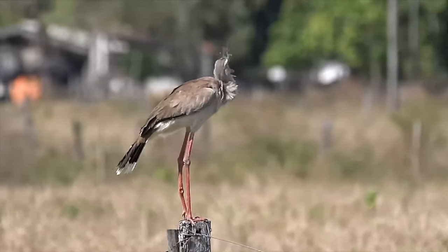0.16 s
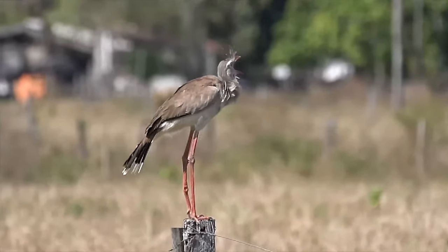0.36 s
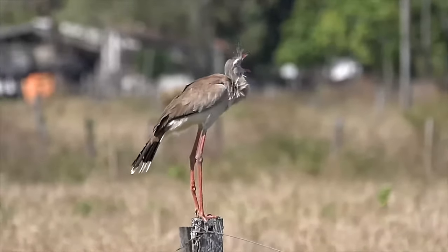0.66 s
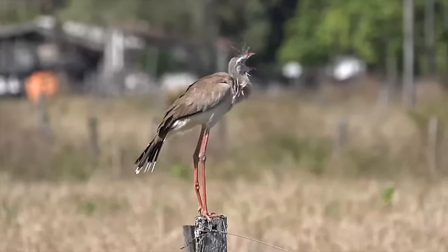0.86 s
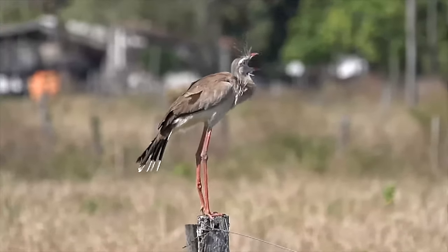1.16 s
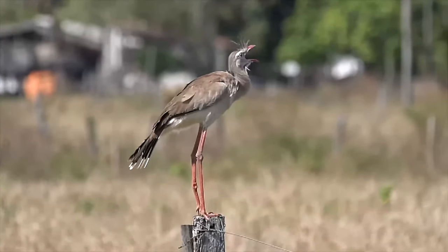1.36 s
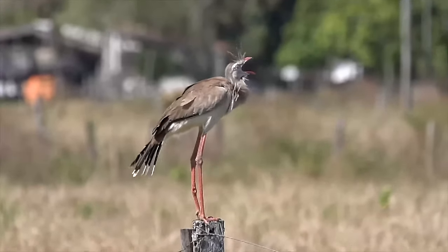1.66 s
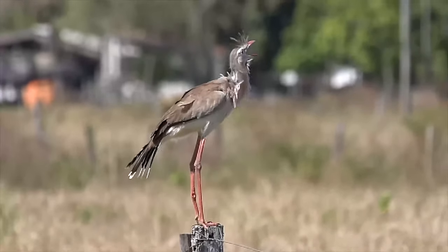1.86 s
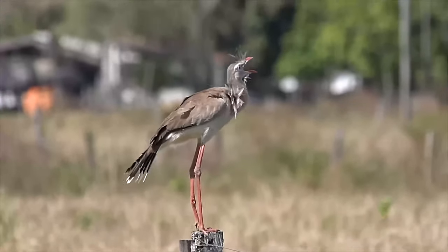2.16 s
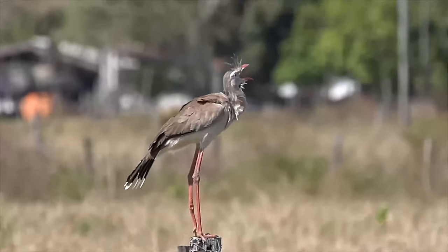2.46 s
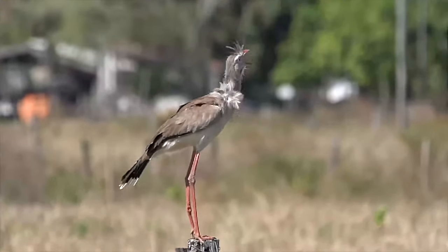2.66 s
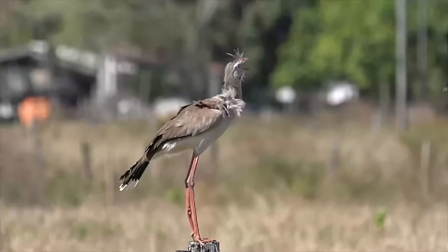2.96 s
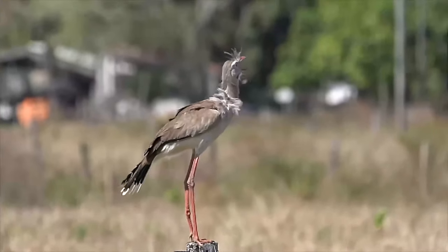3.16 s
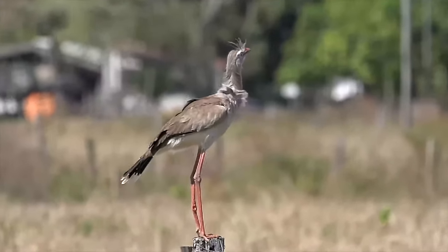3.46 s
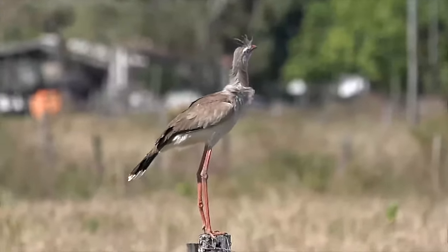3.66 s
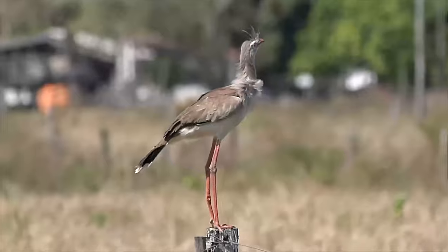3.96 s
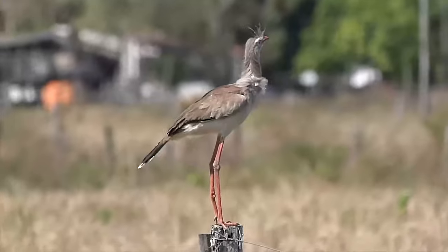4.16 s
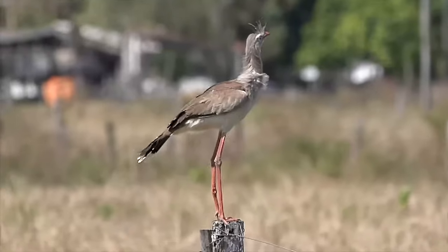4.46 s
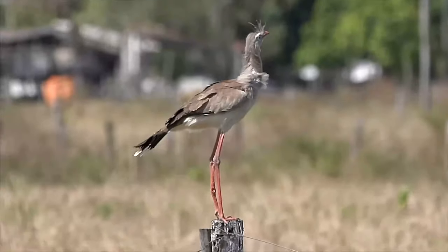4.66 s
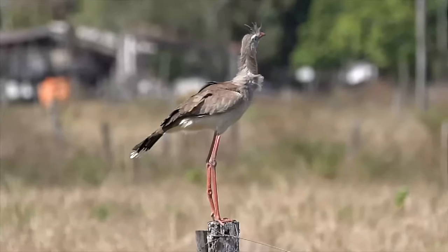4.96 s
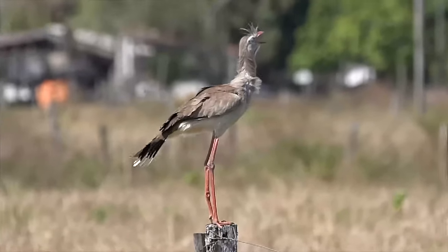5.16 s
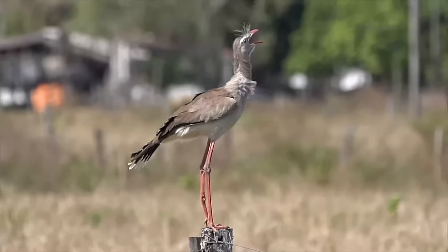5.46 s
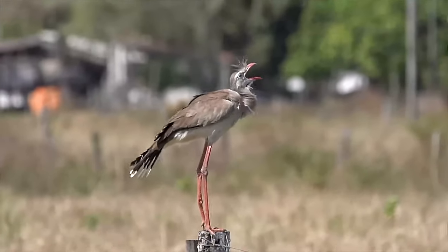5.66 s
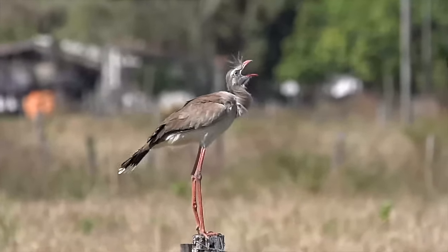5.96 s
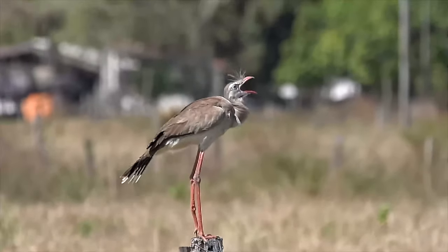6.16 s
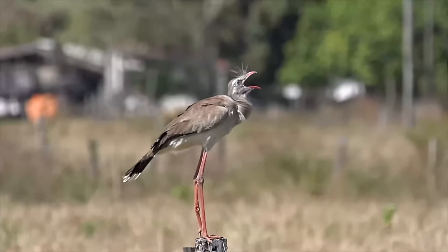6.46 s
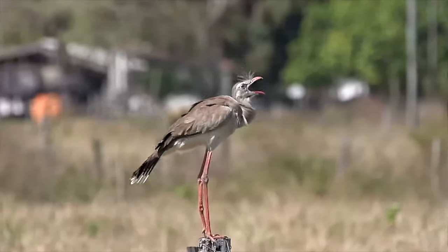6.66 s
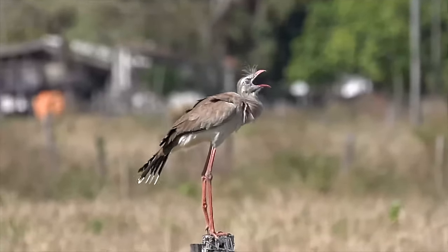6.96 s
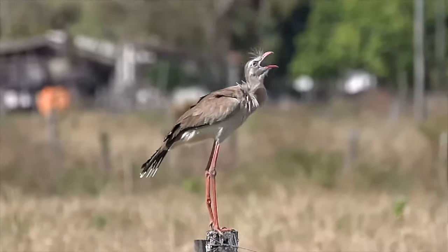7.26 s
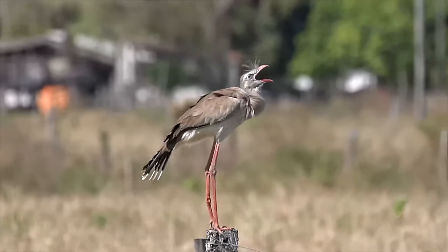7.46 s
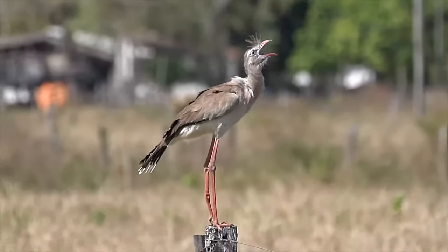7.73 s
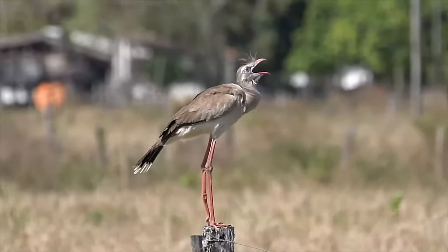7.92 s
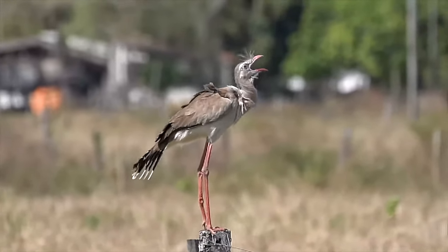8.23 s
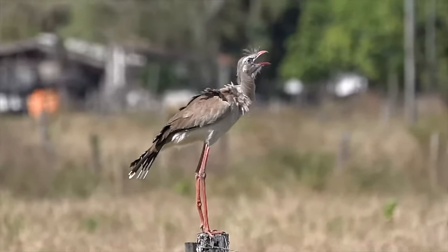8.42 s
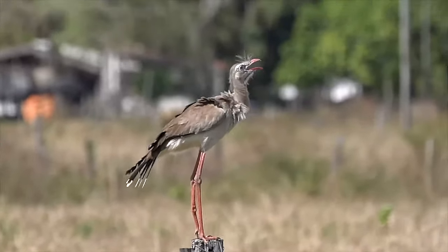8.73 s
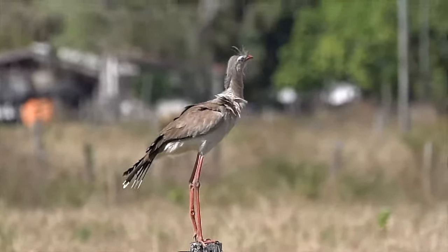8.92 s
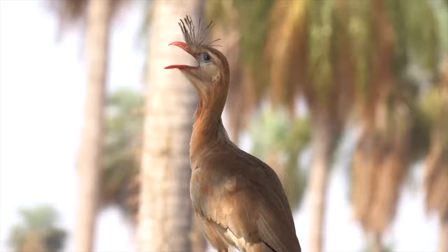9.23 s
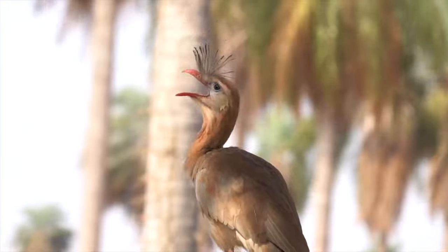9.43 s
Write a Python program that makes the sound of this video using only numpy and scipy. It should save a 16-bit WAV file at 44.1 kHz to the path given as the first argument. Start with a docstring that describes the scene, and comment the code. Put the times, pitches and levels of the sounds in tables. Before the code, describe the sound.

Loud, raspy-edged bird yelps descend in series across a windy pasture, then a closer bird calls with more echo.

```python
"""Large ground birds cluck and yelp in a windy pasture: each note is a clear arched stack of harmonics
that cracks into a rasp at both ends, where the vocal membranes flap chaotically. Far trees return the
notes, and gusts buffet a two-port microphone over a faint murmur, dry rustles and hiss.
Near the end the scene changes to a closer bird among palms, with more echo, a far dove and no wind."""
import sys
import numpy as np
from scipy import signal
from scipy.fft import rfft, irfft, next_fast_len
from scipy.io import wavfile
from scipy.ndimage import uniform_filter1d, map_coordinates

SR = 44100
rng = np.random.default_rng(int(sys.argv[2]) if len(sys.argv) > 2 else 0)


def file_out(sig):
    """Save sig as 16-bit WAV at sys.argv[1]."""
    # one column per channel
    cols = np.atleast_2d(sig).T
    # limit, then scale
    lim = np.clip(cols, -1, 1)
    pcm = np.round(lim * 32767).astype(np.int16)
    wavfile.write(sys.argv[1], SR, pcm)


N = 422919

# Background strength over time: time_s, murmur_relative_db, hiss_db
BACKGROUND = [(0.0, -59, -62), (0.6, -62.5, -61.5), (1.49, -64, -62), (2.3, -60.5, -59.5),
              (2.72, -64, -60.5), (3.47, -58.5, -56.5), (3.7, -51.5, -54.5), (4.28, -62, -58),
              (4.32, -62, -61), (5.4, -66, -66), (6.2, -55.5, -62.5), (6.89, -63.5, -66), (7.32, -55, -61),
              (7.55, -69, -66), (8.25, -64.5, -63.5), (8.9, -55, -59), (9.32, -42, -58),
              (9.59, -47.5, -57.5)]
# Breaks of the voice: start_s, length_s, first_hz, settled_hz, level_db, octave_db, throb_depth
VOICE_BREAKS = [(.386, .054, 2790, 2015, -13.5, -26, 0.82), (0.637, 0.016, 1150, 1050, -35, -23, 0.73),
                (0.86, 0.014, 2545, 1953, -14.5, -27, 0.5), (1.307, 0.012, 2270, 1810, -13.5, -27.5, 0.2),
                (4.304, 0.015, 1890, 1660, -16.5, -20.5, 0.4), (4.323, 0.017, 1696, 1750, -24, -20, 0),
                (4.416, 0.022, 1424, 1440, -33, -6, 0.2), (4.642, 0.023, 1425, 1404, -28.5, -9, 0.16),
                (4.651, 0.024, 1380, 1616, -20, -15, 0.73), (4.746, 0.016, 1650, 1584, -22.5, -9.5, 0.12),
                (4.978, 0.033, 1650, 1475, -24, -20, 0), (5.071, 0.019, 1560, 1530, -33.5, -15, 0.3),
                (6.228, 0.02, 2880, 1853, -21.5, -12, .6), (6.696, 0.0096, 2180, 1776, -18.5, -17.5, 0.6),
                (9.188, 0.0077, 1406, 1418, -11.5, -12, 0)]


def amp(db):
    """Amplitude ratio of a level in decibels."""
    return 10 ** (np.asarray(db) / 20)


def unit(x):
    """Normalisation to an rms of 1."""
    return x / np.sqrt(np.mean(x ** 2) + 1e-20)


def along(points, hz):
    """Interpolation of a table's columns on a logarithmic frequency axis."""
    knots_hz, *columns = np.transpose(points)
    return np.squeeze([np.interp(np.log(hz + 1), np.log(knots_hz + 1), c) for c in columns])


def curves(rows):
    """Linear interpolation of a table's columns over time, one value per sample."""
    times, *columns = np.transpose(rows)
    return [np.interp(np.arange(N) / SR, times, c) for c in columns]


def wobble(rate):
    """Smooth random modulation: a spline through rate knots a second."""
    return map_coordinates(rng.standard_normal(int(N * rate / SR) + 4), [np.arange(N) * rate / SR])


def filtered(x, response):
    """Linear filtering: the spectrum times a complex frequency response."""
    size = next_fast_len(N + SR // 2)
    return irfft(rfft(x, size) * response(np.fft.rfftfreq(size, 1 / SR)), size)[..., :N]


def noise(spectrum, channels=1):
    """Spectral shaping of white noise, at an rms of 1."""
    return unit(filtered(rng.standard_normal((channels, N)), lambda hz: amp(along(spectrum, hz))))


def ports(balance_db, lead_rad):
    """Level and phase differences between two ports, at constant total power."""
    left = amp(balance_db) * np.sqrt(2 / (1 + amp(2 * balance_db)))
    right = left / amp(balance_db)
    return np.array([left * np.exp(.5j * lead_rad), right * np.exp(-.5j * lead_rad)])


def bursts(rows):
    """Envelope of transients: quick rise, hold, short fall."""
    out = np.zeros(N)
    for start, db, length in rows:
        t = np.arange(round((length + .01) * SR)) / SR
        edge = np.clip(np.minimum(t / 0.0042, (length - t) / 0.0054 + 1), 0, 1)
        out[round(start * SR):][:len(t)] += amp(db) * edge
    return out


def wind():
    """Turbulent pressure: eddies buffet the ports and flap brightly over a gentler, deep rumble."""
    # Wind strength: time_s, buffet_db, brightness_db
    strength = [(0.0, -65.5, -12), (0.38, -37, -26.5), (0.48, -68.5, -5.5), (1.26, -43.5, -23.5),
                (1.61, -74.5, 13.5), (1.98, -43.5, -25), (2.44, -26, -15.5), (2.79, -41, -15.5),
                (3.21, -55.5, 1.5), (3.29, -37, -12.5), (3.54, -51, 2.5), (4.12, -40.5, -14),
                (4.6, -21.5, -15.5), (4.72, -30, -17.5), (4.8, -24.5, -13), (4.87, -22.5, -2),
                (5.3, -37.5, -14.5), (5.43, -26, -6.5), (5.53, -32, -7.5), (5.68, -22.5, -1),
                (5.75, -30.5, -8.5), (6.4, -20, -10), (6.45, -22.5, -1), (7.08, -21, -6),
                (7.23, -34.5, -11), (7.61, -27, -11.5), (7.86, -33, -13), (8.16, -65, 2),
                (8.51, -46.5, -13.5), (9.02, -52, 11.5)]
    # Gusts and lulls: start_s, length_s, buffet_change_db, brightness_change_db
    gusts = [(1.079, 0.091, 6.5, 5.5), (1.923, .06, 9, -1.5), (2.107, .11, 4, 0.5), (2.232, 0.04, -7.5, 12),
             (3.332, 0.057, 7.5, -0.5), (4.306, 0.04, 5, 5.5), (4.533, 0.14, 1.5, 4.5),
             (4.849, 0.22, 0.5, 6.5), (5.392, 0.034, 7.5, 7.5), (5.642, .06, 5, 2.5),
             (5.779, .07, -3.5, 11.5), (5.866, 0.046, 7.5, -5.5), (5.94, 0.055, 3, 2),
             (6.058, .05, -12.5, -2.5), (6.124, .07, -0.5, 6), (7.037, .05, 2, 1), (7.565, 0.075, -1, 1.5),
             (7.92, 0.059, -8, -5)]
    # Turbulence spectra, deep to bright: frequency_hz, relative_density_db
    rumble_spectrum = [(12, -26.5), (25, -0.5), (55, 8.5), (90, 2), (160, -40.5), (600, -120)]
    buffet_spectrum = [(40, -48), (65, -0.5), (100, 2), (200, -3), (300, -15), (500, -72.5), (1500, -120)]
    flap_spectrum = [(120, -32.5), (200, -7), (313, -2.5), (362, -5.5), (426, -9), (1100, -31),
                     (1430, -60.5), (2420, -120)]
    # Single strong eddies: centre_s, frequency_hz, peak_db
    thumps = [(4.34, 250, -24), (4.484, 400, -14), (5.41, 330, -16), (5.47, 300, -24)]
    # Wind at the ports: frequency_hz, left_minus_right_db, left_lead_rad
    port_differences = [(30, 0, .4), (90, -.3, .6), (180, -.6, 1.0), (350, -1.5, 1.5), (700, -2.3, 1.75)]
    t = np.arange(N) / SR
    buffet_db, bright_db = curves(strength)
    buffet_db += 3 * wobble(7.9)  # quick swings in strength
    for start, length, gust_db, sharp_db in gusts:
        shape = np.clip(np.minimum(t - start, start + length - t) / 0.013 + .5, 0, 1)
        buffet_db += gust_db * shape
        bright_db += sharp_db * shape
    eddies = wobble(25)
    rumble_db = 0.51 * uniform_filter1d(buffet_db, size=4000) - 23.5 + 1.6 * eddies
    rumble = amp(rumble_db) * noise(rumble_spectrum, channels=2)
    buffet = amp(buffet_db) * unit(amp(2.13 * eddies) * noise(buffet_spectrum, channels=2))
    spikes = amp(1.9 * eddies + 3.96 * wobble(90))
    flap = amp(buffet_db + bright_db) * unit(spikes * noise(flap_spectrum, channels=2))
    common, opposed = rumble + buffet + flap
    lag = np.arange(-400, 400) / SR
    for centre, hz, db in thumps:
        pulse = np.exp(-(lag * hz * 1.2) ** 2) * np.cos(2 * np.pi * hz * lag)
        common[round((centre + lag[0]) * SR):][:len(lag)] += amp(db) * pulse
    return filtered(common, lambda hz: ports(*along(port_differences, hz))) + 0.05 * opposed * [[1], [-1]]


def field_murmur():
    """Incoherent sources: far leaves and field sounds merge into a wavering noise."""
    # Murmur spectrum: frequency_hz, relative_density_db
    spectrum = [(250, -5.5), (500, -1.5), (1200, 0), (2500, -11), (5000, -17.5), (7000, -81), (12000, -120)]
    murmur_db, _ = curves(BACKGROUND)
    return amp(murmur_db + 6.0 + 0.39 * wobble(16)) * noise(spectrum, channels=2)


def microphone_hiss():
    """Self-noise of the microphone, independent in each channel."""
    # Hiss spectrum: frequency_hz, relative_density_db
    spectrum = [(2350, -11.5), (4000, -1.5), (5310, -2), (5830, 1), (9830, -4.5), (15200, -8), (16000, -32)]
    _, hiss_db = curves(BACKGROUND)
    return amp(hiss_db) * noise(spectrum, channels=2)


def rasp(note_rasp_db):
    """Chaotic oscillation: in clucks, notes and squawks the membranes' rate lurches every few cycles."""
    # Short rasping clucks: start_s, level_db, length_s
    clucks = [(.001, -28.5, 0.018), (.15, -36.5, 0.012), (.316, -37.5, 0.021), (.638, -53, 0.082),
              (.79, -37, 0.013), (3.504, -42, 0.013), (4.255, -37.5, 0.013), (5.277, -39.5, 0.011),
              (5.578, -45, 0.0077), (5.95, -44, 0.0095), (6.107, -46, 0.018), (6.235, -35.5, 0.055),
              (8.8, -19, 0.0042), (9.46, -28, 0.011)]
    # Throat response: frequency_hz, gain_db
    throat = [(600, -13.5), (950, -11.5), (1400, 3), (2200, 1.5), (2900, -4.5), (3500, -18.5),
              (5000, -15.5), (8000, -35.5), (14000, -34.5)]
    phase = 2 * np.pi * np.cumsum(1250 * np.exp(.17 * wobble(380))) / SR
    flaps = amp(0.31 * wobble(380)) * sum(np.sin(k * phase + k * k) for k in range(1, 7))
    creak = unit(filtered(flaps, lambda hz: amp(along(throat, hz))))
    breath = unit(amp(0.34 * wobble(390)) * noise(throat)[0])
    screech = bursts([(start, db - 13, length) for start, length, _, _, db, _, _ in VOICE_BREAKS])
    return (amp(note_rasp_db) + bursts(clucks) + screech) * unit(creak + .9 * breath)


def note(start, length, first_hz, top_hz, last_hz, top_at, db, onset_db, close_db, *rasp_levels):
    """Frequency and amplitude modulation of one yelp: times, pitch arch, voice level and rasp level."""
    attack_s, release_s, tail_s, sag_hz_per_s = .002, .006, .031, 3700
    half, end = length / 2, length + release_s + tail_s
    t = np.arange(-attack_s, min(end, N / SR - start - 1 / SR), 1 / SR)
    progress, top_at = np.clip(t / length, 0, 1), np.clip(top_at, .03, .97)
    rise = np.clip(1 - progress / top_at, 0, 1)
    fall = np.clip((progress - top_at) / (1 - top_at), 0, 1)
    pitch = top_hz - (top_hz - first_hz) * rise ** 2.42 - (top_hz - last_hz) * fall ** 2.8
    pitch -= sag_hz_per_s * np.clip(t - length, 0, None)
    voice_times = [-attack_s, 0, min(0.023, half), length, length + release_s, end]
    envelope_db = np.interp(t, voice_times, [onset_db - 34, onset_db, 0, 0, -30, -70])
    level_db = db + close_db * fall ** 3.2 + envelope_db
    first, middle, last = rasp_levels
    # The rasp outlasts the voice.
    rasp_times = [-attack_s, 0, min(0.025, half), length - min(.01, half), length, length + 0.017, end]
    rasp_db = np.interp(t, rasp_times, [first - 34, first, middle, middle, last, last - 3, last - 22])
    return start + t, pitch, level_db, rasp_db


def voice():
    """Source and filter: windpipe and bill shape a harmonic series. Returns it and the rasp's level."""
    # Yelps: start_s, length_s, first_hz, top_hz, last_hz, top_at_fraction, level_db, onset_relative_db,
    # close_relative_db, rasp_onset_db, rasp_middle_db, rasp_close_db, overtones_relative_db,
    # slope_db_per_harmonic, third_harmonic_offset_db, fourth_harmonic_offset_db
    yelps = [ (0.169, 0.066, 1228, 1343, 1267, 0.74, -26.5, -0.5, 1.5, -41, -55, -35, 2, -4, 2, 0.5),
             (0.419, 0.047, 1198, 1186, 1208, 0.96, -32.5, 5, -9, -50, -56, -38.5, 9, -3, 6, 6),
             (.438, 0.072, 1585, 1529, 1324, 0.064, -17, -5.5, -11, -39, -43.5, -29, -1, -4, 1.5, -1),
             (.87, 0.11, 1572, 1533, 1350, 0.23, -15.5, -3, -9.5, -54, -50, -24.5, 1, -4, -1, -5.5),
             (1.313, .123, 1474, 1512, 1378, 0.36, -15.5, -2, -9, -54.5, -54.5, -27.5, -2, -5, -15.5, 5),
             (1.731, 0.13, 1358, 1449, 1350, .55, -16.5, -5.5, -10, -22.5, -65.5, -25.5, -1, -4.5, 4, 7),
             (2.139, 0.13, 1269, 1387, 1277, .55, -15, -1.5, -10.5, -20.5, -53, -24, 2, -3.5, -0.5, 5),
             (2.526, 0.13, 1199, 1327, 1206, .55, -15, -3, -11, -20, -45, -26.5, 1.5, -4, 0, 2.5),
             (2.895, 0.13, 1131, 1271, 1120, .45, -15.5, -0.5, -9, -19.5, -39.5, -36.5, -5, -2, -4, 5.5),
             (3.255, .12, 1102, 1174, 1010, 0.48, -14, -5.5, -10.5, -24, -55, -37, -6, -2.5, -8, -6),
             (3.533, 0.042, 846, 893, 912, 0.4, -41, 3.5, 6, -60, -64.5, -53, 6, -9.5, 0, -4),
             (3.803, 0.022, 1097, 1120, 1023, 0.62, -25, -23, -1.5, -20.5, -30, -27.5, 14, -10, 13.5, -10),
             (3.827, 0.074, 1485, 1619, 1510, 0.6, -16, 1.5, -1, -16.5, -46, -24, 6, -7, -5.5, -6.5),
             (4.328, .088, 1847, 1903, 1815, .45, -14, 0.5, -8, -22.5, -62, -39.5, -18, -4, 2.5, 5.5),
             (4.669, 0.089, 1818, 1930, 1875, 0.53, -14.5, -8.5, -10, -30, -51.5, -33.5, -12.5, -4.5, 9.5, 10.5),
             (4.998, 0.084, 1813, 1884, 1800, 0.51, -27.5, 0, -5, -33, -58, -45.5, -13, -6, -5, 12),
             (5.298, 0.037, 860, 1072, 1090, 0.71, -27, -6, 8.5, -25, -32, -32.5, -10, -7.5, 8, -4),
             (5.313, 0.076, 1733, 1818, 1783, 0.5, -24, -2.5, -0.5, -26.5, -40, -42, -6.5, -3.5, -6.5, 5),
             (5.338, 0.064, 1315, 1343, 1245, 0.74, -27, 0.5, 0, -36.5, -36.5, -37, -5.5, -1.5, -5.5, -2.5),
             (5.594, 0.032, 1312, 1396, 1467, .9, -32, -0.5, 12, -36.5, -42, -33.5, 1.5, -6.5, -7.5, -5),
             (5.63, 0.043, 1725, 1760, 1737, 0.17, -25, -1.5, -5, -35.5, -46.5, -37, 1.5, -9.5, -5.5, -8),
             (5.737, 0.1, 1530, 1740, 1675, 1, -19.5, -1, -0.5, -28, -61.5, -36.5, -3.5, -3.5, 4.5, -1.5),
             (5.848, 0.029, 1398, 1335, 1204, .1, -28, 4.5, -2.5, -45.5, -48.5, -31.5, -4.5, -3, 7, 1),
             (5.888, 0.056, 1274, 1386, 1320, 0.6, -29.5, -2.5, 1.5, -31, -58, -36, 6.5, -3.5, -0.5, 4),
             (6.13, .022, 1200, 1218, 1110, .1, -32.5, -6, -4, -29.5, -31, -31, 5, -2.5, 3, 9),
             (6.156, .032, 1210, 1228, 1227, 0.55, -30, -1.5, -2, -35, -39.5, -41.5, 10, -3.5, 1.5, 9),
             (6.242, 0.019, 1500, 1590, 1605, 1, -20, -3, 0, -34.5, -31.5, -40, -1, -4, 12, 10),
             (6.263, 0.039, 1904, 1902, 1760, 0.21, -13.5, -3.5, -7, -32.5, -39, -38, -9.5, -4.5, 6.5, 6),
             (6.3, 0.061, 1590, 1493, 1252, 0.056, -22.5, -1.5, -11.5, -51, -51.5, -35, 1.5, -3, 4, 3.5),
             (6.701, 0.12, 1486, 1536, 1330, .25, -21.5, -1.5, -14, -51, -51.5, -33.5, 3, -2.5, 0.5, 4.5),
             (7.141, 0.14, 1430, 1480, 1313, .3, -20, -3.5, -12, -23, -63.5, -31.5, -0.5, -2, 3.5, 5),
             (7.557, 0.13, 1282, 1413, 1330, 0.55, -20, -5, -7.5, -23, -51, -29, 4, -4.5, 4, -1),
             (7.96, 0.13, 1250, 1375, 1232, 0.65, -20, 0, -11.5, -20.5, -61.5, -31, 1.5, -3, -3, 1),
             (8.345, 0.14, 1203, 1321, 1130, .6, -18, -9, -24, -21, -58, -35.5, -1.5, -3.5, -0.5, -7.5),
             (8.483, 0.03, 967, 1158, 1180, 1, -31.5, 1.5, 6.5, -30, -43, -37, -1, -2.5, 0.5, -25),
             (8.511, 0.032, 1405, 1400, 1380, 0.39, -27, -3.5, 0, -41, -46, -35, -6, -2.5, -22, -9),
             (8.716, 0.13, 1128, 1232, 1070, 0.48, -23.5, 0, -9.5, -28, -42.5, -34.5, 3.5, -3, -1, 6),
             (8.818, 0.081, 1510, 1673, 1640, .65, -17.5, -4.5, -0.5, -16.5, -44, -26, -1, -3, -2, -1),
             (9.028, 0.019, 1186, 1210, 1177, 0.09, -16.5, 9, -11, -31, -27.5, -31, -18, -1, 7.5, 4),
             (9.06, .041, 1172, 1318, 1325, .9, -11, -14, 0, -25.5, -21.5, -40, -8, -9.5, 10.5, 0),
             (9.099, 0.099, 1598, 1764, 1750, .8, -11.5, 0.5, 2, -40, -50.5, -31.5, 2, -7.5, -7, -3),
             (9.477, .108, 1441, 1667, 1508, 0.93, -11, -2, -1.5, -30.5, -39, -23, 4, -7, -9, -6.5), ]
    # Throbs at a fraction of the pitch: start_s, end_s, pitch_divisor, sideband_db
    subharmonics = [(1.352, 1.405, 2, -37), (2.557, 2.592, 3, -31.5), (2.934, 2.965, 3, -19),
                    (3.834, 3.912, 3, -38), (5.333, 5.374, 2, -20.5), (6.252, 6.293, 6, -11.5),
                    (6.696, 6.773, 2, -33.5), (7.64, 7.688, 2, -52), (9.094, 9.175, 42, -15.5),
                    (9.483, 9.57, 22, -13), (9.546, 9.587, 5, -9.5)]
    # Resonances of windpipe and open bill: frequency_hz, gain_db
    tract = [(900, -0.5), (1500, 2), (1900, -0.5), (2300, 0), (2750, 3), (3100, -6), (3650, -9),
             (4200, -3.5), (4600, -10), (5300, -4.5), (6000, -9.5), (6700, -15), (8500, -14.5),
             (11000, -17.5), (15000, -20)]
    out, rasp_db = np.zeros(N), np.full(N, -90.)
    tremor = wobble(120)
    for start, length, *contour, overtones_db, slope_db, third_db, fourth_db in yelps:
        t, pitch, level_db, note_rasp_db = note(start, length, *contour)
        span = slice(round(t[0] * SR), round(t[0] * SR) + len(t))
        pitch = uniform_filter1d(pitch, size=500)
        phase = 2 * np.pi * np.cumsum(pitch * (1 + 0.003 * tremor[span])) / SR
        throb = np.ones(len(t))
        for begin, end, divisor, sideband_db in subharmonics:
            depth = 2 * amp(sideband_db) * np.clip(np.minimum(t - begin, end - t) / 0.0096, 0, 1)
            throb *= 1 + depth * np.cos(phase / divisor)
            if divisor < 4:  # neighbouring cycles differ in timing as well as size
                phase += depth * np.sin(phase / divisor)
        harmonics = min(12, int(SR / 2 / pitch.max()))
        offset_db = overtones_db + np.r_[-overtones_db, 0, third_db, fourth_db, np.zeros(harmonics)]
        dulling_db = 400 * np.clip(t - start - length, 0, None)  # overtones die first after the close
        tilt_db = slope_db - dulling_db + 0.48 * tremor[span]
        stack = sum(amp(along(tract, (k + 1) * pitch) + offset_db[k] + k * tilt_db)
                    * np.sin((k + 1) * phase + k * k * 0.75) for k in range(harmonics))
        out[span] += amp(level_db) * throb * unit(stack)
        rasp_db[span] = np.maximum(rasp_db[span], note_rasp_db)
    return out, rasp_db


def scatter(x, t60_s, build_s, colour):
    """Diffuse reverberation: clumped returns from trees and grass, uncorrelated at the two ports."""
    t = np.arange(SR) / SR
    decay = amp(-60 * t / t60_s + 5 * wobble(30)[:SR])
    tail = rng.standard_normal((2, SR)) * decay * np.clip(t / build_s, 0, 1)
    returns = signal.fftconvolve(x[None], tail / np.linalg.norm(tail[0]), axes=1)[:, :N]
    return filtered(returns, colour)


def pasture(calls):
    """Multipath propagation: the direct sound, echoes from far tree lines and a faint diffuse tail."""
    # Direct path: frequency_hz, left_minus_right_db, left_lead_rad
    port_differences = [(1015, 0.5, 1.5), (1309, 5, -2.5), (1490, -10, -1.5), (1760, -23, 1),
                        (1962, -5, -5), (2500, -2, -6), (3130, -3, -5.5), (4090, 2.5, -5), (5803, -11, -15),
                        (5935, -4, -5), (8970, -2.5, -4.5)]
    # Tree-line reflections: delay_s, relative_db
    tree_lines = [(.235, -28), (.33, -37)]
    # Colour of the echoes and of the diffuse tail: frequency_hz, gain_db
    echo_colour = [(900, -9), (1400, -18.5), (1800, -15.5), (2700, -5.5), (4000, -18), (8000, -34)]
    tail_colour = [(900, -6.5), (1400, 3), (1900, -9.5), (2700, -4.5), (4000, -2), (8000, -37)]

    def paths(hz):
        echoes = sum(amp(db) * np.exp(-2j * np.pi * hz * delay) for delay, db in tree_lines)
        return 0.94 * ports(*along(port_differences, hz)) + amp(along(echo_colour, hz)) * echoes

    tail = scatter(calls, t60_s=6.0, build_s=.06, colour=lambda hz: amp(along(tail_colour, hz)))
    return filtered(calls, paths) + amp(-27.5) * tail


def squawks():
    """Amplitude modulation: the breaking voice chops three harmonics about 290 times a second."""
    out = np.zeros(N)
    chop_phase = 2 * np.pi * np.cumsum(290 + 70 * wobble(90)) / SR
    drift = 1 + 0.047 * wobble(250)
    for start, length, first_hz, settled_hz, db, octave_db, throb in VOICE_BREAKS:
        span = slice(round(start * SR), round((start + length) * SR))
        t = np.arange(span.stop - span.start) / SR
        pitch = settled_hz + (first_hz - settled_hz) * np.exp(-t / 0.004)
        phase = 2 * np.pi * np.cumsum(pitch * drift[span]) / SR
        tone = np.sin(phase) + amp(octave_db) * (np.sin(2 * phase) + .5 * np.sin(3 * phase))
        edge = np.clip(np.minimum(t, length - t) / 0.0021, 0, 1)
        out[span] += amp(db) * edge * (1 + throb * np.cos(chop_phase[span])) * tone
    return out


def grass_rustle():
    """Broadband transients: dry grass nearby gives off flickering bursts of bright noise."""
    # Rustles and ticks: start_s, level_db, length_s
    rustles = [(.6, -47.5, .03), (.64, -53, .055), (3.504, -50, 0.0058), (4.053, -36, 0.004),
               (7.3, -51, 0.056), (7.6, -50, 0.099)]
    # Grass spectrum: frequency_hz, relative_density_db
    spectrum = [(800, -18), (2000, -11.5), (5000, -4), (9000, -3.5), (15000, -18)]
    return bursts(rustles) * amp(3 * wobble(200)) * noise(spectrum, channels=2)


def palm_grove(calls):
    """Double-slope decay: the direct sound, strong early scatter from palms and a weaker, longer tail."""
    # Direct path: frequency_hz, left_minus_right_db, left_lead_rad
    port_differences = [(1200, 2.1, 0.15), (1600, 7.4, 0.026), (3200, 3.8, 0.23), (5000, 2.9, 1.4)]
    direct = filtered(calls, lambda hz: 0.73 * ports(*along(port_differences, hz)))
    early = scatter(calls, t60_s=0.27, build_s=0.0029, colour=lambda hz: 1 / (1 + 1j * hz / 4500) ** 2)
    late = scatter(calls, t60_s=1.5, build_s=.05, colour=lambda hz: 1 / (1 + 1j * hz / 6000))
    return direct + amp(-2) * early + amp(-10.5) * late


def grove_rumble():
    """Band-limited noise: a faint, steady rumble strongest near 75 Hz."""
    return amp(-59.5) * noise([(40, -27.0), (75, 13), (130, -5), (300, -11), (1500, -120)])


def dove():
    """A modulated pure tone: one soft, far coo that wavers in pitch and level."""
    # Contour of the coo: time_s, pitch_hz, relative_db
    coo = [(9.28, 436, -50), (9.296, 425, -58), (9.346, 494, -34.5), (9.354, 561, -34), (9.421, 535, -42)]
    pitch, db = curves(coo)
    t = np.arange(N) / SR
    edge = np.clip(np.minimum(t - coo[0][0], coo[-1][0] - t) / 0.016, 0, 1)
    envelope = amp(db + 5 + 5.8 * wobble(60)) * edge
    phase = 2 * np.pi * np.cumsum(pitch * (1 + 0.046 * wobble(90))) / SR
    return envelope * np.sin(phase)


def scene():
    """Superposition: birds in the windy pasture, then in the palm grove, over a faint background."""
    clear, rasp_db = voice()
    calls = clear + rasp(rasp_db) + squawks()
    in_pasture = np.arange(N) < round(9.027 * SR)
    field = pasture(calls * in_pasture) + wind()
    grove = palm_grove(calls * ~in_pasture) + dove() + grove_rumble()
    return np.where(in_pasture, field, grove) + field_murmur() + grass_rustle() + microphone_hiss()


def record(dry):
    """Soft saturation rounds the peaks; a band limit removes the highest treble."""
    ceiling, band_limit_hz = .85, 15900
    soft = dry / (1 + np.abs(dry / ceiling) ** 6) ** (1 / 6)
    return filtered(soft, lambda hz: hz < band_limit_hz)


dry = scene()
out = record(dry)
file_out(out)
```